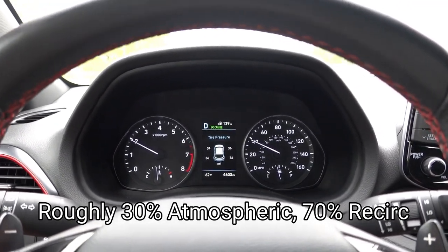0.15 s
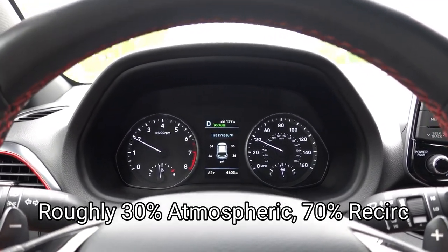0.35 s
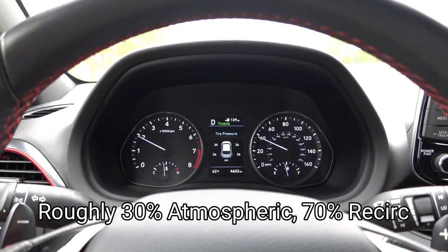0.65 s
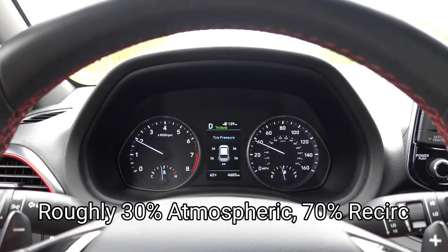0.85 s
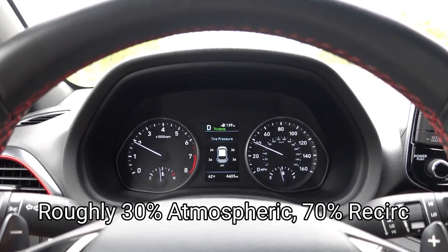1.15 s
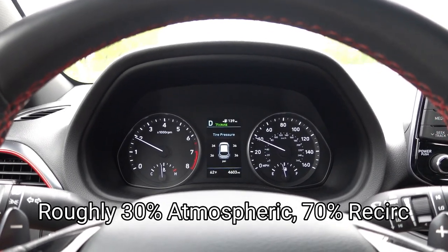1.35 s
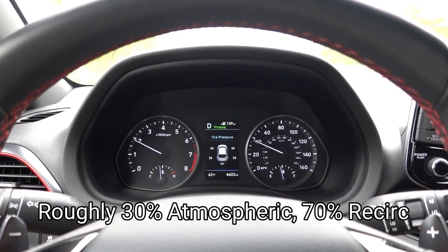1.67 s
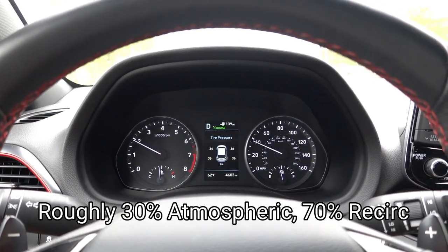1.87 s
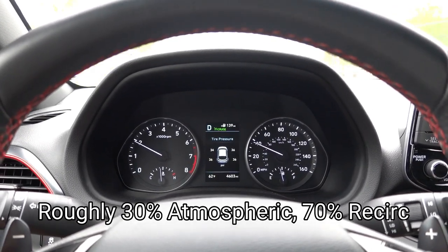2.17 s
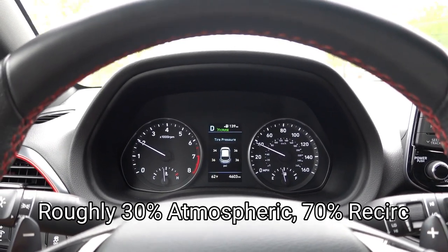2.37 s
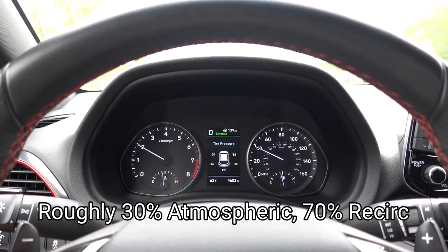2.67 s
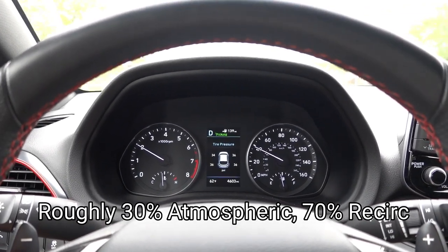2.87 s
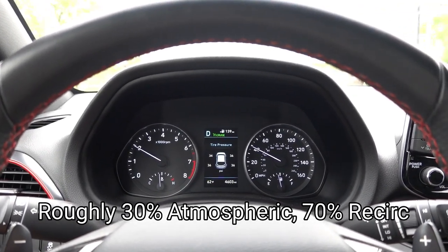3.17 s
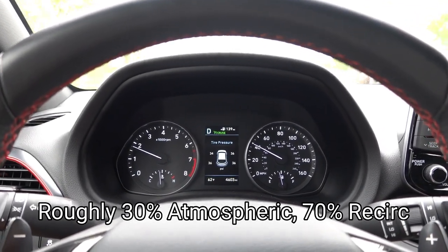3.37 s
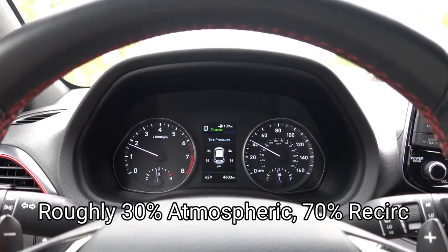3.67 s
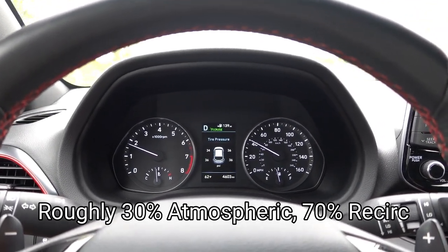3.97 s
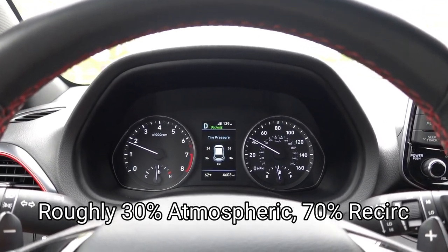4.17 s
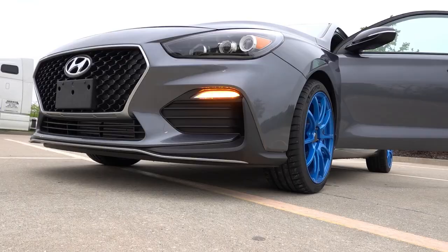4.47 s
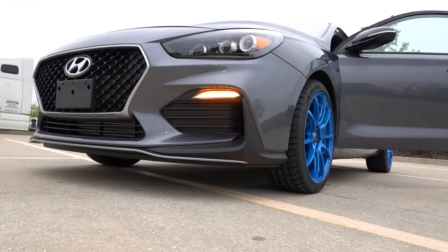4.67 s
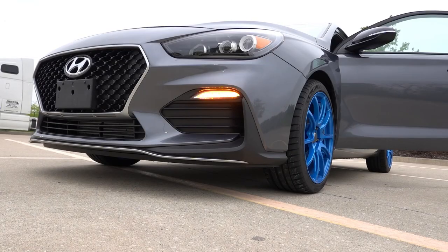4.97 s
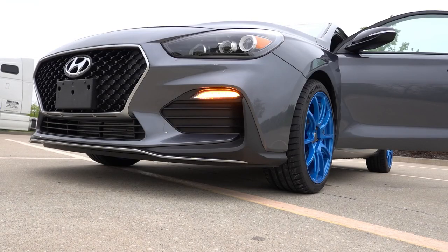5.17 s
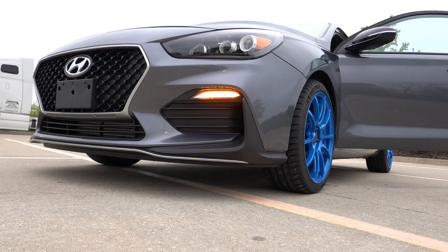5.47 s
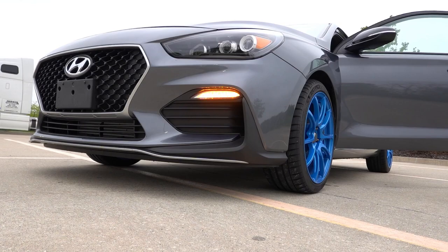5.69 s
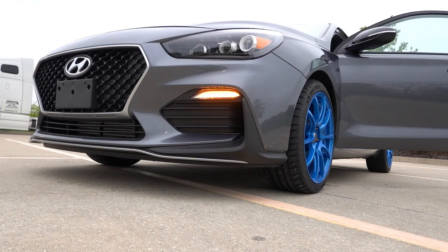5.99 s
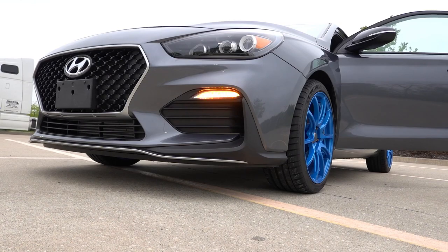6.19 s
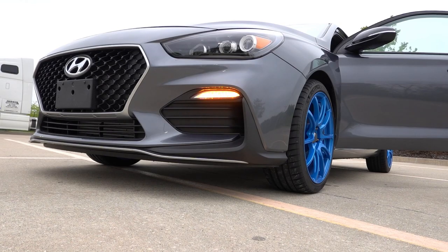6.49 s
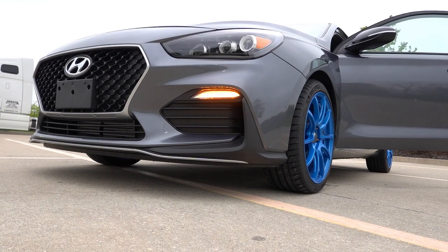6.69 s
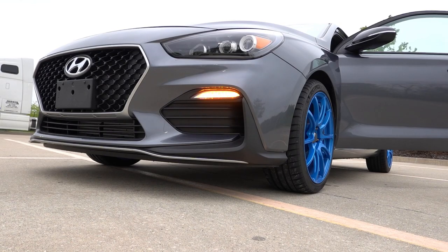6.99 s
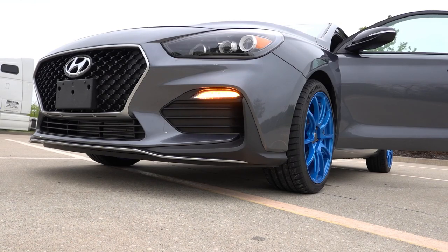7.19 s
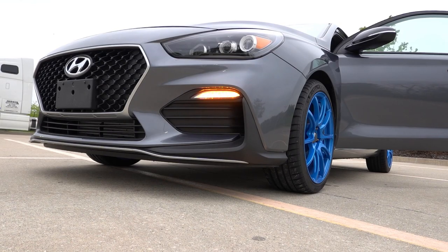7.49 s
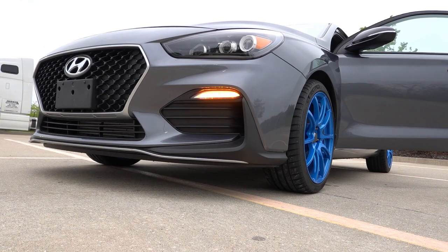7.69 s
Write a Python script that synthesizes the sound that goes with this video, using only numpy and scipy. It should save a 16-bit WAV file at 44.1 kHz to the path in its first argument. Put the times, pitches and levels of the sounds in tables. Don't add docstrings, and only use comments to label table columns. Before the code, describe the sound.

Booming drive inside a small car, a soft turbo sigh, then outside, two throttle blips each ending in a bright jet of escaping air.

```python
import sys
import numpy as np
from scipy import signal
from scipy.fft import rfft, irfft, next_fast_len
from scipy.io import wavfile
from scipy.ndimage import uniform_filter1d, map_coordinates

SR = 44100
rng = np.random.default_rng(int(sys.argv[2]) if len(sys.argv) > 2 else 0)


def dump(signal):
    limited = np.clip(np.atleast_2d(signal).T, -1, 1)
    pcm = np.round(limited * 32767).astype(np.int16)
    wavfile.write(sys.argv[1], SR, pcm)


def invert_db(x):
    u = np.asarray(x, float) / 20
    return 10 ** u


N = 345743
TIME_S = np.arange(N) / SR


def unit(x):
    return x / np.sqrt(np.mean(x ** 2) + 1e-20)


def curves(rows):
    s, *columns = np.transpose(rows)
    return [np.interp(TIME_S, s, column) for column in columns]


def wobble(rate_hz):
    at = np.arange(0, N + 32, 32)
    knots = rng.standard_normal(int(N * rate_hz / SR) + 4)
    return np.interp(np.arange(N), at, map_coordinates(knots, [at * rate_hz / SR]))


def ramp(start_s, length_s):
    return np.clip((TIME_S - start_s) / length_s, 0, 1)


def swells(rows):
    t = np.arange(0, N + 64, 64) / SR
    bells = [db * np.exp(-((t - s) / half_s) ** 2) for s, half_s, db in rows]
    return np.interp(TIME_S, t, np.max(bells, axis=0) + np.min(bells, axis=0))


def filtered(x, response):
    m = next_fast_len(N + SR // 2)
    return irfft(rfft(x, m) * response(np.fft.rfftfreq(m, 1 / SR)), m)[:N]


def upper(x, edge_hz):
    return filtered(x, lambda f: 1 / (1 + (edge_hz / (f + 1)) ** 8))


def colour(points):
    hz, db = np.transpose(points)
    return lambda f: invert_db(np.interp(np.log(f + 1), np.log(hz + 1), db))


def modes(table):
    def response(f):
        total = 0
        for k, (centre, width, db) in enumerate(table):
            resonance = 1j * f * width / (centre * centre - f * f + 1j * f * width)
            total = total + (-1) ** k * invert_db(db) * resonance
        return total
    return response


def humps(table):
    return lambda f: invert_db(sum(db / (1 + (2 * (f - centre) / width) ** 2) for centre, width, db in table))


def rush(response, patchy_db):
    z = signal.stft(rng.standard_normal(N + 512), nperseg=512)[2]
    field = uniform_filter1d(rng.standard_normal(z.shape), size=6, axis=0)
    field = uniform_filter1d(field, size=12, axis=1)
    patchy = signal.istft(z * invert_db(patchy_db * unit(field)), nperseg=512)[1][:N]
    return unit(filtered(patchy, response))


def even(x, span_s):
    span = int(span_s * SR)
    power = uniform_filter1d(uniform_filter1d(x ** 2, span), span)
    return unit(x / (np.abs(power) + .05) ** 0.35)


# pitch_hz, level_db (per Hz)
BOOM_COLOUR = [(4.7, -40), (8.0, -13), (43, -3.5), (90, -11.5), (120, -38.5), (200, -120)]
# pitch_hz, width_hz, level_db
CABIN_MODES = [(104, 25.5, -7), (138.6, 27.64, 0), (165.6, 34.03, -3), (222, 30, -10.5)]
# pitch_hz, level_db (per Hz)
TREAD_COLOUR = [(150, -37.5), (260, 0), (291, -7), (345, -1.5), (380, -0.5), (455, -9), (539, -8.5),
                (627, -13), (899, -17.5), (1030, -12), (1300, -20), (2500, -38), (3250, -63.5),
                (5500, -120)]
# pitch_hz, level_db (per Hz)
GLASS_COLOUR = [(1200, -25.5), (2000, -2.5), (3000, -7), (4450, -12.5), (5300, -22.5), (6500, -32.5),
                (8000, -51)]
# peak_s, extra_boom_db, extra_drone_db
ROUGH_PATCHES = [(.03, 10, 3.5), (.2, 4.5, 7), (.26, 15, 0.5), (.55, 4.5, 4), (.7, -1, 5), (1.02, 6.5, 7),
                 (1.2, 12.5, 7.5), (1.32, 6, 0), (1.43, -2, 3.5), (1.78, -2, 3.5), (1.93, -1, 7),
                 (2.1, 8, 6), (2.22, 3.5, 2.5), (2.91, 0, 4.5), (3.03, 0, 8), (3.09, 11.5, -2),
                 (3.18, 4.5, -1.5), (3.33, 10.5, -0.5), (3.44, 0, 2), (3.61, -7, 1), (3.73, 11, 1.5),
                 (3.89, 7, 7), (4.02, 6, 3), (4.14, 4.5, 0.5), (4.25, 2, 4)]
# peak_s, half_length_s, extra_db
SIDE_PUFFS = [
    (2.36, 0.36, 4.5),
    (3.05, 0.49, 3),
    (3.56, 0.14, 8.5),
]


def road():
    patch_s = .05
    boom_db = -30.5 + swells([(s, patch_s, db) for s, db, _ in ROUGH_PATCHES])
    drone_db = -27.55 + swells([(s, 0.64 * patch_s, db) for s, _, db in ROUGH_PATCHES])
    tread_db = -36.5 + 0.3 * TIME_S + 0.37 * wobble(6.5)
    draught_db = -61 + swells(SIDE_PUFFS) + .5 * wobble(9)
    boom = invert_db(boom_db) * even(rush(colour(BOOM_COLOUR), patchy_db=2.8), span_s=0.053)
    drone = invert_db(drone_db) * even(rush(modes(CABIN_MODES), patchy_db=-1.5), span_s=0.044)
    tread = invert_db(tread_db) * rush(colour(TREAD_COLOUR), patchy_db=0.3)
    draught = invert_db(draught_db) * rush(colour(GLASS_COLOUR), patchy_db=0.5)
    return boom + drone + tread + draught


# start_s, peak_db, shell_db, cabin_air_db, slap_db
ROAD_JOINTS = [
    (0.04, -10.5, 1, -1, -27),
    (0.204, -8, 1.5, -5, -24.5),
    (0.983, -5.5, -11.5, -1, -25),
    (1.166, -10, 4, -5.5, -21),
    (1.904, -15.5, -3.5, -6.5, -27.5),
    (2.859, -12.5, -6, 0.5, -20.5),
    (3.284, -15.5, 1, -7, -24),
]


def bumps():
    shell_hz, shell_t60_s = 46, 0.35
    air_hz, air_t60_s = 110, 0.26
    out, t = np.zeros(N), np.arange(SR // 3) / SR
    slap_colour = [(250, -31.0), (500, -1), (650, 5.0), (900, -3.5), (1500, -36.0), (2500, -93)]
    slap = unit(filtered(rng.standard_normal(N), colour(slap_colour)))
    rise = 1 - np.exp(-t / 0.017)
    smack = np.sin(np.pi / 2 * np.minimum(t / 0.0035, 1)) ** 2 * invert_db(-60 * t / .14)
    detunes = 1 + 0.054 * rng.standard_normal((len(ROAD_JOINTS), 2))
    for (s, db, shell_db, air_db, slap_db), (shell_tune, air_tune) in zip(ROAD_JOINTS, detunes):
        shell = invert_db(shell_db - 60 * t / shell_t60_s) * np.sin(2 * np.pi * shell_hz * shell_tune * t)
        air = invert_db(air_db - 60 * t / air_t60_s) * np.sin(2 * np.pi * air_hz * air_tune * t)
        at = round(s * SR)
        out[at:][:len(t)] += invert_db(db) * rise * (shell + air)
        out[at - SR // 110:][:len(t)] += invert_db(db + slap_db - 4.0) * smack * slap[at:][:len(t)]
    return out


# start_s, peak_db
TRIM_TICKS = [(0.0492, -56), (0.2302, -54.5), (0.2932, -44), (0.54, -61), (0.6008, -50.5), (0.9994, -58),
              (1.0271, -54), (1.1684, -58), (1.3829, -52.5), (3.2968, -53), (3.347, -58)]


def trim():
    out, t = np.zeros(N), np.arange(SR // 20) / SR
    shape = invert_db(-60 * t / .004) + invert_db(-12.5 - 60 * t / .07)
    for s, db in TRIM_TICKS:
        out[round(s * SR):][:len(t)] += invert_db(db - 2.0) * shape * rng.standard_normal(len(t))
    return filtered(out, colour([(2500, -37), (4500, 5), (10000, -9.5), (15000, -9)]))


def rustle():
    start_s, half_length_s, level_db = 1.035, .022, -62.5
    swell = np.exp(-((TIME_S - start_s) / half_length_s) ** 2)
    cloth = colour([(2000, -18), (4500, 5), (6000, -12), (10000, -21), (14000, -37)])
    return invert_db(level_db) * swell * rush(cloth, patchy_db=2.0)


# pitch_hz, level_db (per Hz)
MUFFLED_COLOUR = [(1060, -31), (1800, 1.5), (2080, -2), (2490, -1), (2650, -2.5), (4510, -1), (5350, -12),
                  (7610, -24.5), (9760, -23), (14000, -39.5)]
# pitch_hz, width_hz, level_db
OUTLET_HUMPS = [(1480, 40, 4), (1600, 40, 3), (1850, 40, 4), (2180, 60, 4), (2395, 35, 4), (2745, 40, 4),
                (3215, 35, 4), (3340, 40, 5), (3540, 30, 4), (3790, 30, 5), (4140, 40, 3), (4365, 80, 4),
                (4667, 30, 5), (5150, 50, 3), (5400, 25, 4), (5900, 40, 5), (6420, 50, 4), (7000, 50, 4),
                (7690, 80, 3), (8730, 40, 5), (9250, 120, 3)]


def sigh():
    crack_s, open_s, attack_s, hold_s, level_db = 3.347, 3.372, .04, 0.11, -45.5
    age = np.maximum(TIME_S - open_s - attack_s, 0)
    released = 1 - np.exp(-np.maximum(age - hold_s, 0) / 0.21)
    body_db = level_db - 3.5 - 22.5 * released
    trickle_db = level_db - 10.5 - 22 * age
    edge_db = level_db - 14.5 - 44 * age
    hiss = rush(lambda f: colour(MUFFLED_COLOUR)(f) * humps(OUTLET_HUMPS)(f), patchy_db=.7)
    edge = upper(hiss, 5800)
    body = unit(hiss - edge)
    crack = ramp(crack_s, .003) * invert_db(level_db - 6) * np.exp(-np.maximum(TIME_S - crack_s, 0) / .015)
    breath = (invert_db(body_db) + invert_db(trickle_db)) * body + invert_db(edge_db) * unit(edge)
    return crack * body + ramp(open_s, attack_s) ** 1.6 * breath


# time_s, crank_hz, firing_note_db
ENGINE_REVS = [(4.46, 28.78, -42), (4.99, 22.8, -37), (5.25, 22.35, -54), (5.34, 24.97, -47),
               (5.41, 26.96, -22), (5.5, 34, -17.5), (5.6, 42.4, -24), (5.77, 54.1, -24),
               (5.94, 52.67, -33), (6.12, 48.8, -29.5), (6.26, 46.73, -41), (6.49, 43.3, -28.5),
               (7.09, 35.36, -31), (7.23, 41.5, -28.5), (7.33, 48.37, -25), (7.55, 65.93, -15.5),
               (7.65, 65.2, -22), (7.84, 63.16, -20.5)]
# down_s, up_s
PEDAL = [
    (5.26, 5.79),
    (7.17, 7.57),
]
# crank_multiple, level_db, extra_under_load_db, revs_db (per octave)
STRONG = [(3, -46.5, 0, 7.5), (4, -43.5, 9, 3), (6, -44, 8, 8.5), (9, -38, 2.5, 4)]
# crank_multiple, level_db (to the roar)
WEAK = [(5, -16.5), (7, -23.5), (8, -17.5), (10, -21), (12, -16), (13, -22), (14, -20)]
# pitch_hz, level_db
PIPE_COLOUR = [(100, -1), (150, -7.5), (195, 1.5), (260, 1), (330, 1), (400, -3.5), (490, -1), (600, -9)]
# pitch_hz, level_db (per Hz)
ROAR_COLOUR = [(24, -33), (40, 0), (64, -17), (96, -16.5), (145, -14.5), (343, -11), (477, -15),
               (594, -16.5), (951, -18), (1340, -18), (1700, -29.5), (2210, -49.5), (3740, -120)]
# pitch_hz, width_hz, level_db
AIRBOX_HUMPS = [(328, 15, 1), (604, 52, 6.5)]


def engine():
    pedal_s, idle_hz = .06, 22.5
    spool_s = 0.54
    overrun_octaves = 1.14
    crank_hz, firing_db = curves(ENGINE_REVS)
    load = sum(ramp(down, pedal_s) - ramp(up, pedal_s) for down, up in PEDAL)
    boost = sum(ramp(down, spool_s) * (1 - ramp(up, 2 * pedal_s)) for down, up in PEDAL)
    octaves = np.log2(crank_hz / idle_hz)
    capped_octaves = np.minimum(octaves, overrun_octaves)
    effort = load * octaves + (1 - load) * capped_octaves
    roar_db = -37 + 8.5 * effort + 3 * load + 3.5 * boost

    turn = 2 * np.pi * np.cumsum(crank_hz * (1 + .002 * wobble(30))) / SR
    tones = invert_db(firing_db) * np.sin(2 * turn + 2)
    for order, db, load_db, revs_db in STRONG:
        order_db = db + load_db * load + revs_db * capped_octaves + 1.9 * wobble(9)
        size = invert_db(order_db) * colour(PIPE_COLOUR)(order * crank_hz)
        scatter = .9 * load * wobble(25)
        tones = tones + size * np.sin(order * turn + scatter)
    for order, db in WEAK:
        tones = tones + invert_db(roar_db + db + 4.9 * wobble(6)) * np.sin(order * turn + 2 * wobble(3))

    throb = np.cos(2 * turn)
    intake = rush(lambda f: colour(ROAR_COLOUR)(f) * humps(AIRBOX_HUMPS)(f), patchy_db=-0.3)
    roar = invert_db(roar_db + 0.5) * unit((1 + 0.17 * throb) * intake)
    honk = load * invert_db(-34.5 + 0.4 * (roar_db + 29.5)) * rush(modes([(335, 14, 0)]), patchy_db=-1.0)
    strain_db = 10 * octaves + 1.5 * load
    return np.sqrt(2) * tones + roar + honk + gear(throb, roar_db, strain_db, load)


# pitch_hz, level_db (per Hz)
GEAR_COLOUR = [(350, -30.5), (650, -8.5), (1100, -11.5), (1600, -9), (2240, -9), (3200, -10.5),
               (4400, -12.5), (4900, -16.5), (5400, -22), (7700, -24), (11000, -27.5), (12500, -35),
               (15500, -43.5)]


def gear(throb, roar_db, strain_db, load):
    whirr = rush(lambda f: colour(GEAR_COLOUR)(f) * humps(OUTLET_HUMPS)(f), patchy_db=1.16)
    whirr = unit((1 + 0.079 * throb) * whirr)
    bracket_hz = 1345 + 5 * wobble(14)
    ring = np.sqrt(2) * np.sin(2 * np.pi * np.cumsum(bracket_hz) / SR)
    ring_db = 0.5 * (roar_db + 29.0) - 41.5 + 1.2 * wobble(4.4) + 2.8 * wobble(15) + 2.7 * load
    return invert_db(-40.1 + strain_db + 0.73 * wobble(12)) * whirr + invert_db(ring_db) * ring


# open_s, shut_s
VALVE_TIMES = [
    (4.44, 4.94),
    (5.25, 5.4),
    (5.8, 6.295),
    (6.47, 6.63),
    (6.83, 7.08),
    (7.58, 7.9),
]
# attack_s, jet_db, boost_lasts_s
VALVE_JETS = [(.02, -36, 0.71), (.02, -39, .5), (0.049, -14, 0.29), (0.051, -32, 1.1), (.04, -35, 1.1),
              (.03, -14, .5)]
# pitch_hz, level_db (per Hz)
JET_COLOUR = [(530, -36), (900, -8.5), (1160, -5.5), (1290, -3.5), (1480, -6), (1860, -5), (2960, -4),
              (3670, -2.5), (3990, -3.5), (4390, 0.5), (5510, -8.5), (6060, -7), (6750, -12.5),
              (9650, -12.5), (15500, -27)]


def vent():
    jet = rush(lambda f: colour(JET_COLOUR)(f) * humps(OUTLET_HUMPS)(f), patchy_db=1.1)
    edge = upper(jet, 5100)
    body, bright = jet - edge, unit(edge)
    flutter_db = .6 * wobble(22)
    out = np.zeros(N)
    for (open_s, shut_s), (attack_s, db, boost_s) in zip(VALVE_TIMES, VALVE_JETS):
        age = TIME_S - open_s - attack_s
        spent = 1 - np.exp(-(np.maximum(age, 0) / boost_s) ** 2.6)
        jet_db = db - 10.5 * spent
        spit_db = (db > -25) * 5 * np.exp(-(age / .025) ** 2)
        edge_db = np.maximum(-11 + .7 * (jet_db + 14), -18.5) + spit_db + 2.5
        gap = (ramp(open_s, attack_s) * (1 - ramp(shut_s, .022))) ** 1.3
        out = out + gap * invert_db(jet_db + flutter_db) * (body + invert_db(edge_db) * bright)
    return out


# pitch_hz, level_db (per Hz)
GUST_COLOUR = [(5, -9), (12, 17), (25, 6.5), (45, -32.5), (80, -20), (120, -120)]
# peak_s, half_length_s, extra_db
WIND_GUSTS = [(4.46, .03, 15), (5.27, .06, 22), (5.41, 0.087, 31), (5.52, .06, 32), (5.69, 0.12, 35.5),
              (5.89, .1, 24), (6.41, .06, 14), (7.04, .06, 28), (7.19, 0.067, 29), (7.43, .13, 34),
              (7.61, .05, 27), (7.82, .11, 27)]


def wind():
    calm_db = -48.5
    lumps = even(rush(colour(GUST_COLOUR), patchy_db=-1.5), span_s=.07)
    return invert_db(calm_db + swells(WIND_GUSTS)) * lumps


def scene():
    outside = ramp(4.4597, .002)
    cabin = road() + bumps() + trim() + rustle() + sigh()
    parked = engine() + vent() + wind()
    return ((1 - outside) * cabin + outside * parked)[None]


def top_cut(x):
    return signal.sosfilt(signal.butter(12, 15690, fs=SR, output="sos"), x)


# pitch_hz, level_db (per Hz)
HISS_COLOUR = [(3000, -18.5), (5500, -1.5), (9000, -2), (15600, -6)]


def record(dry):
    mix = dry + invert_db(-80.5) * rush(colour(HISS_COLOUR), patchy_db=0.5)
    mix = mix / (1 + np.abs(mix / .92) ** 4) ** (1 / 4)
    return top_cut(mix)


dry = scene()
out = record(dry)
dump(out)
```